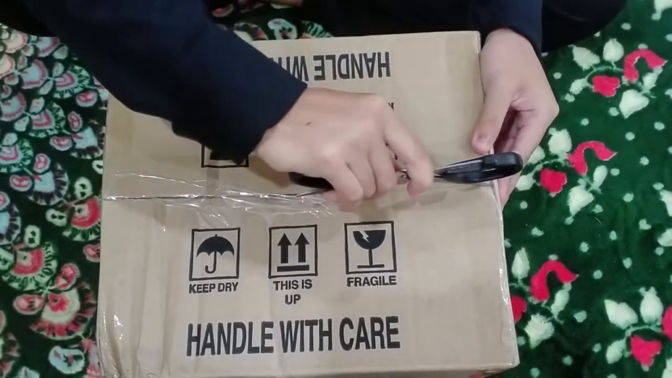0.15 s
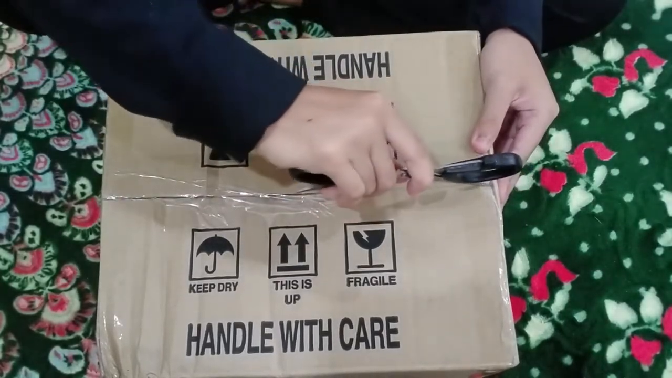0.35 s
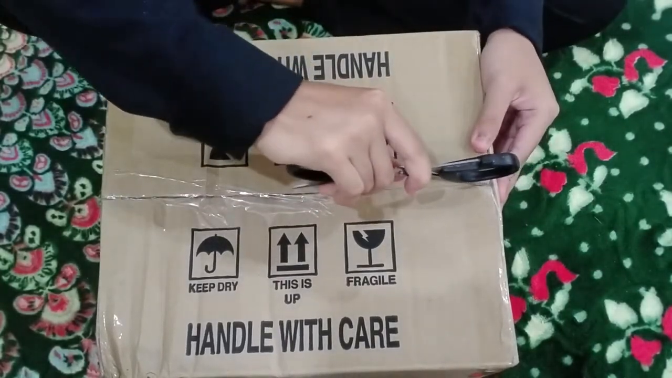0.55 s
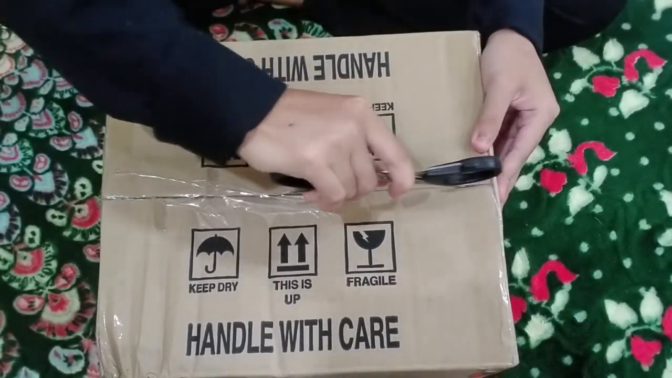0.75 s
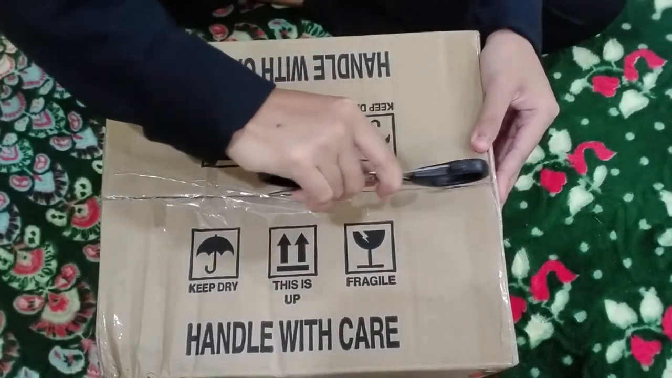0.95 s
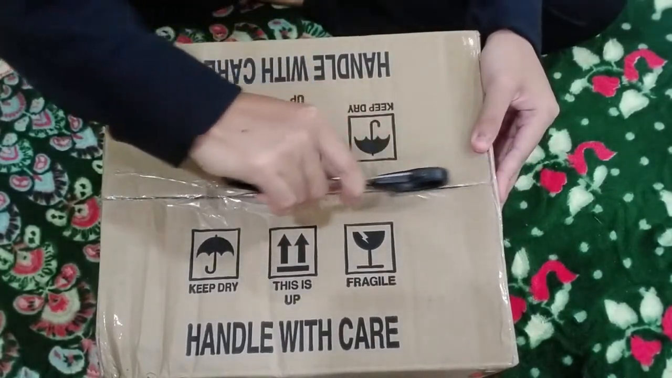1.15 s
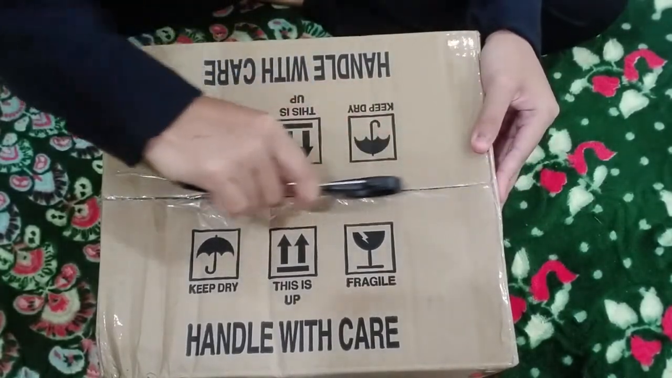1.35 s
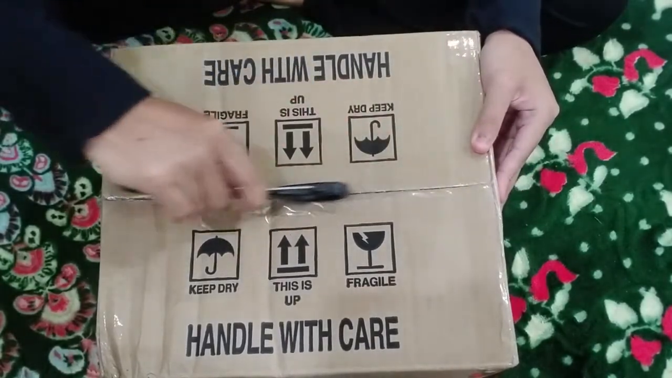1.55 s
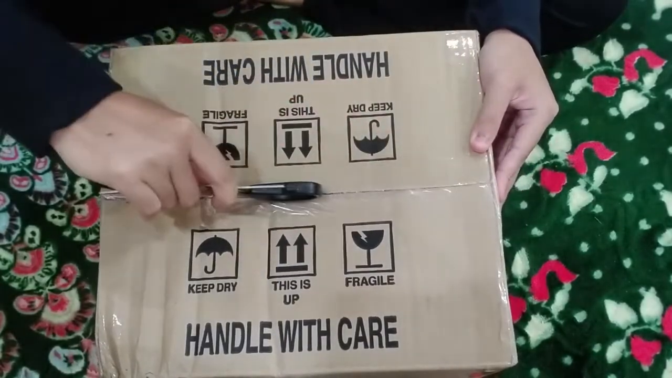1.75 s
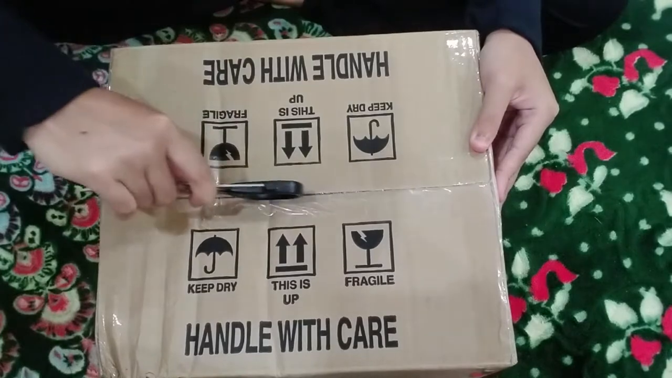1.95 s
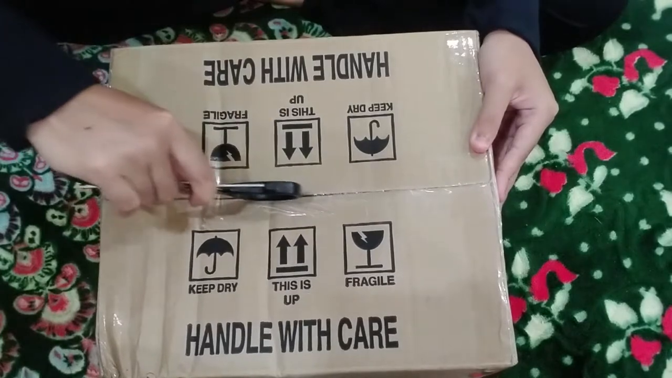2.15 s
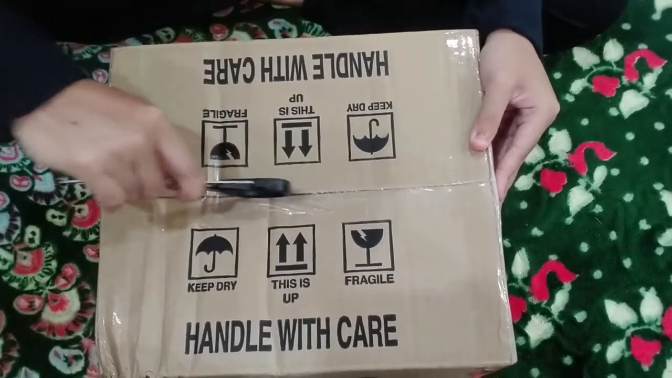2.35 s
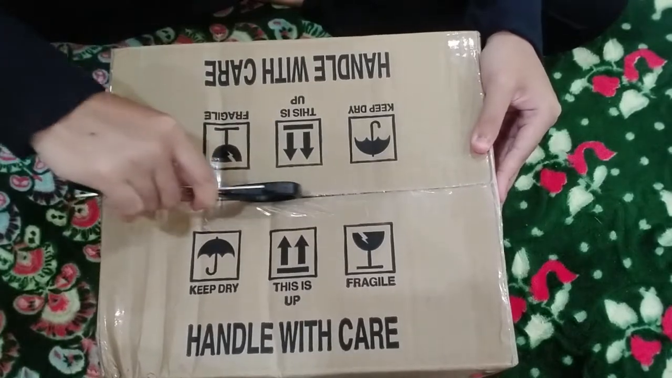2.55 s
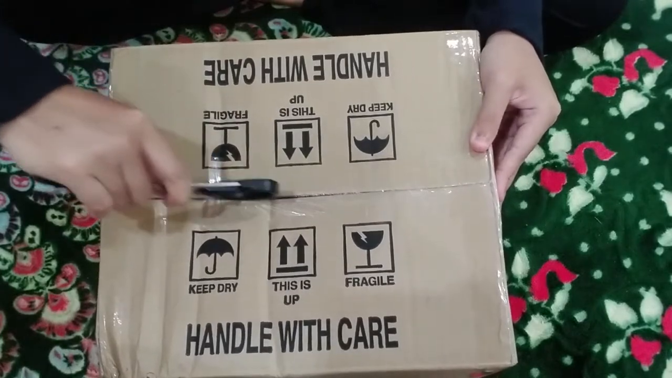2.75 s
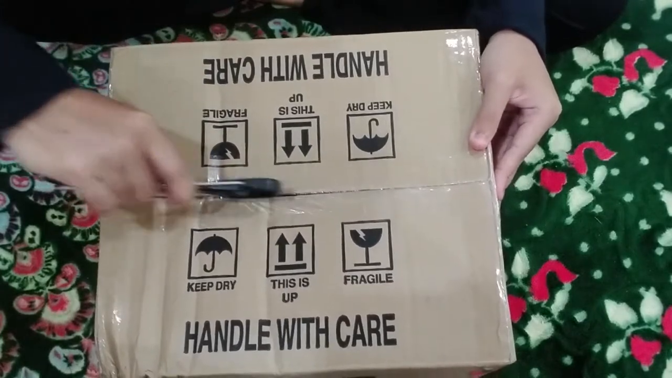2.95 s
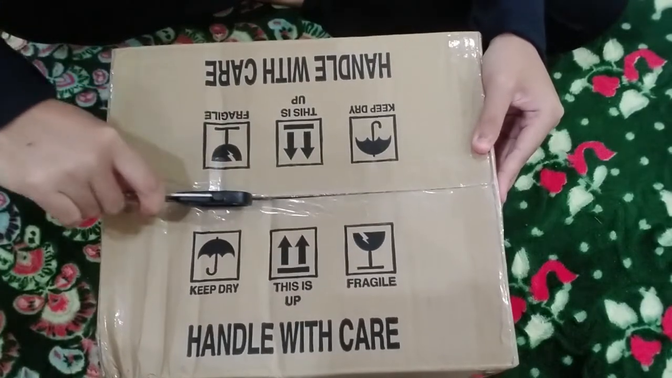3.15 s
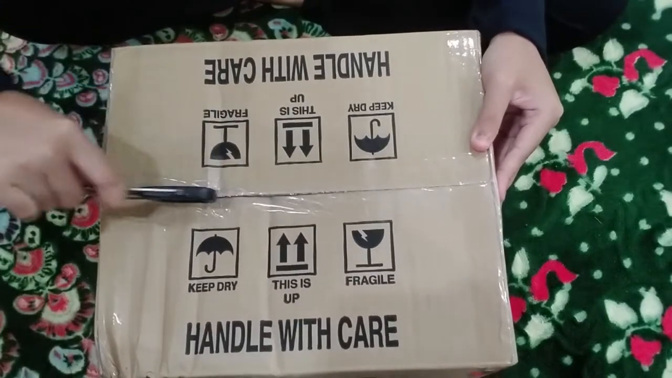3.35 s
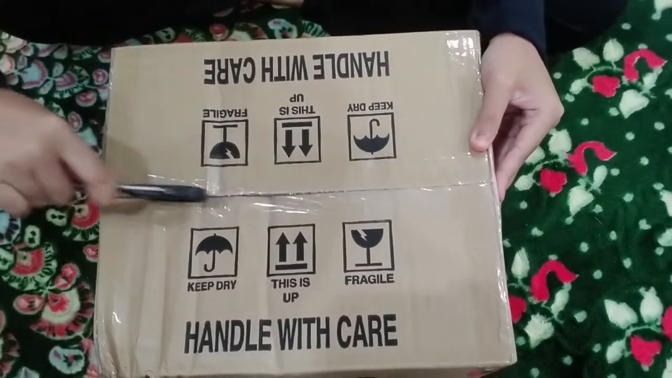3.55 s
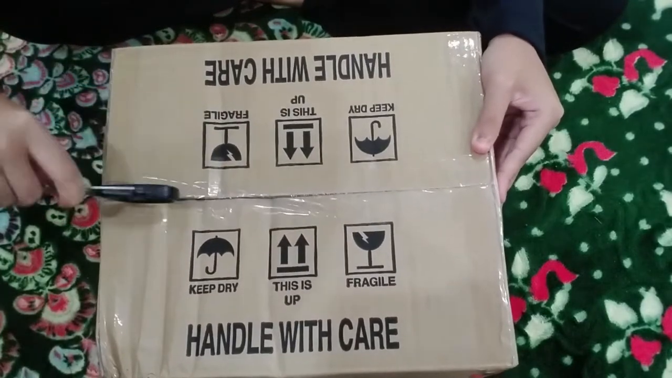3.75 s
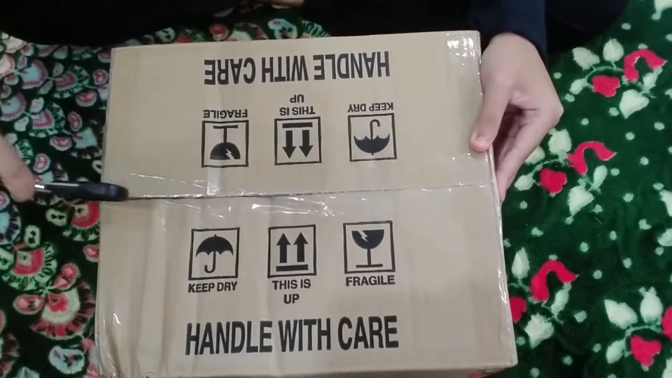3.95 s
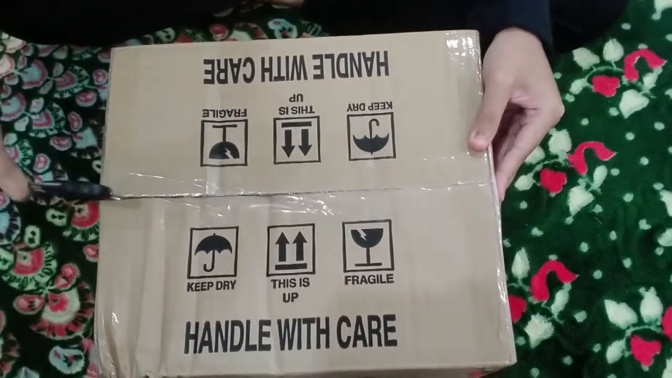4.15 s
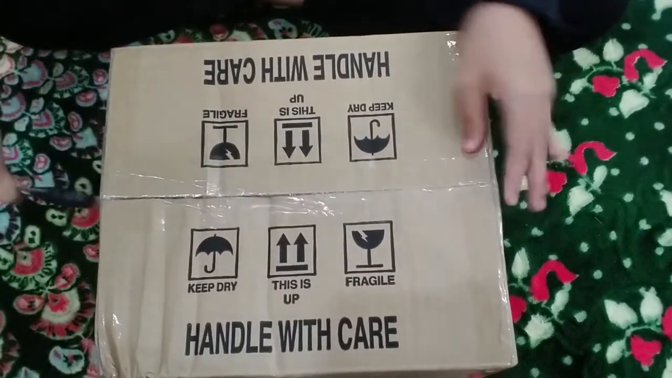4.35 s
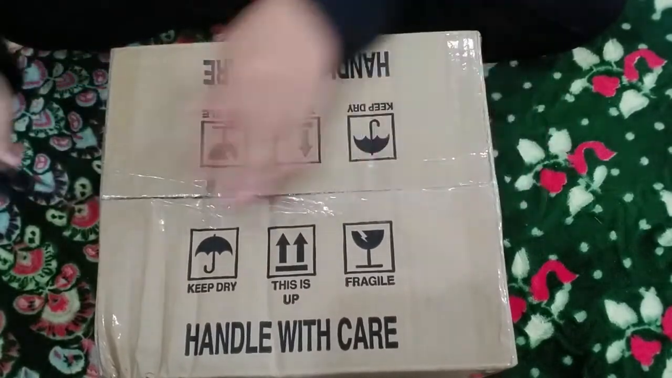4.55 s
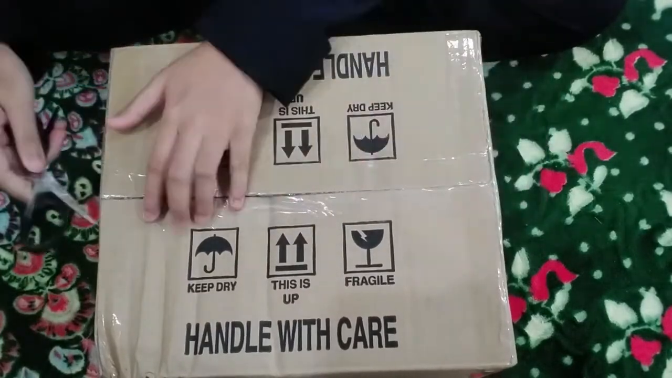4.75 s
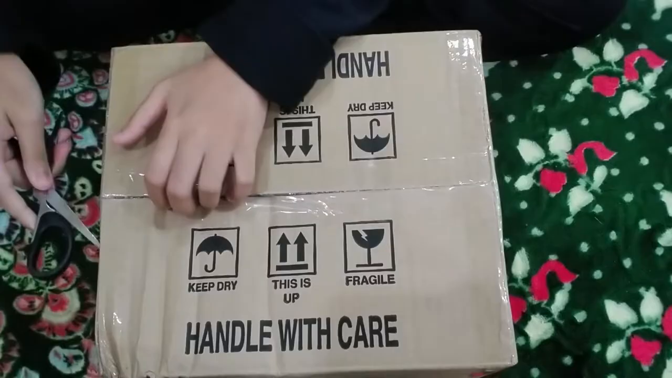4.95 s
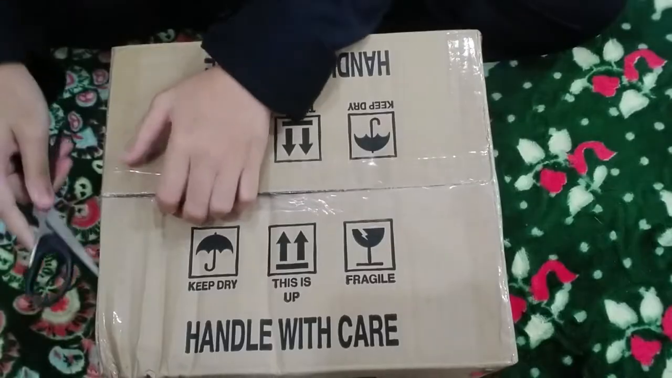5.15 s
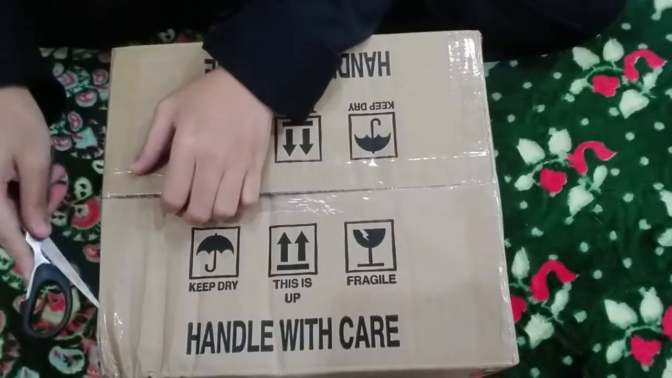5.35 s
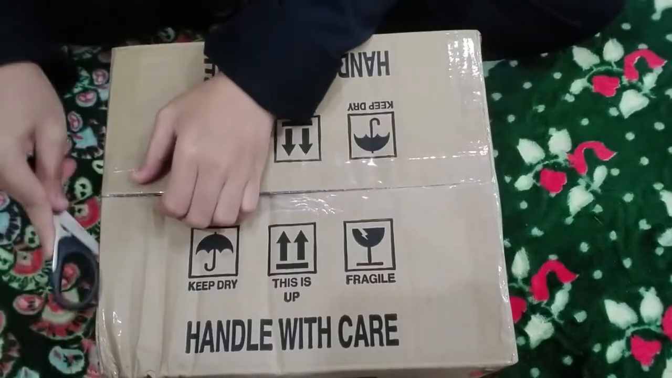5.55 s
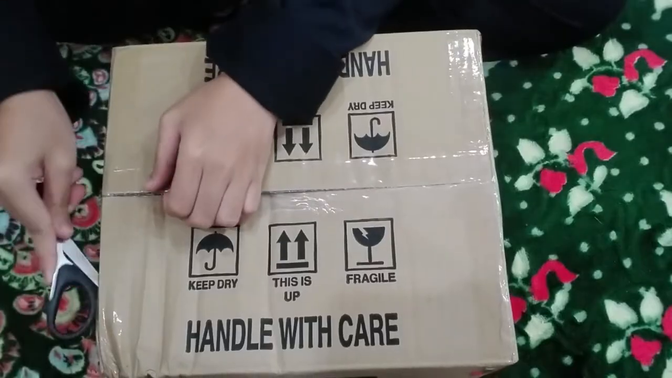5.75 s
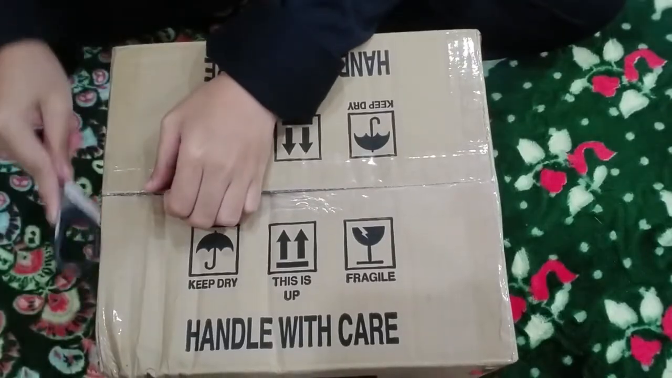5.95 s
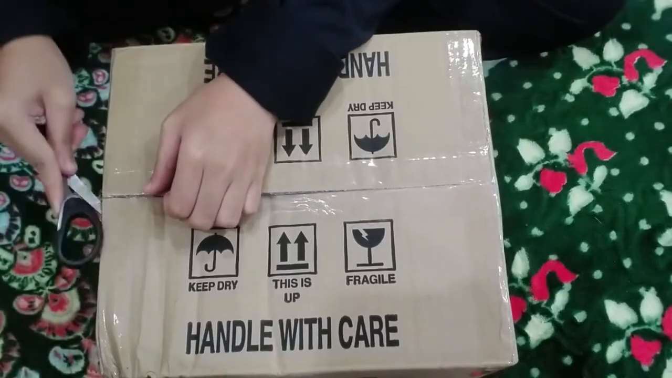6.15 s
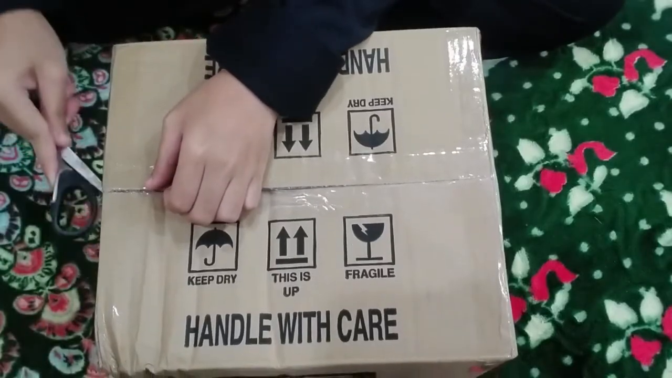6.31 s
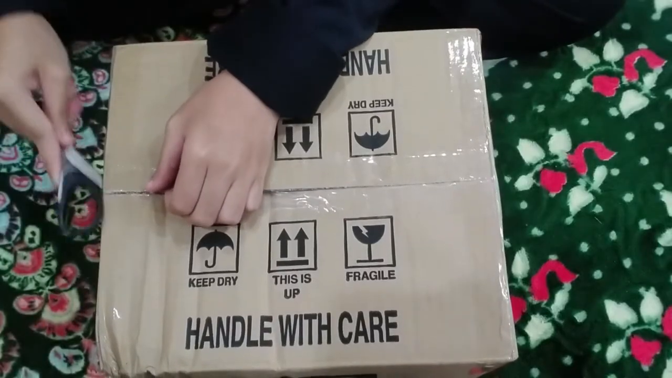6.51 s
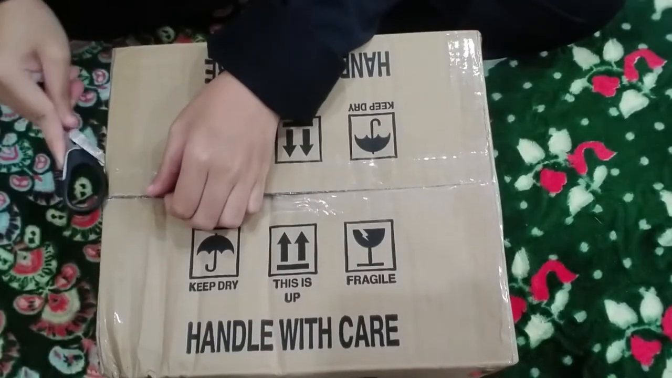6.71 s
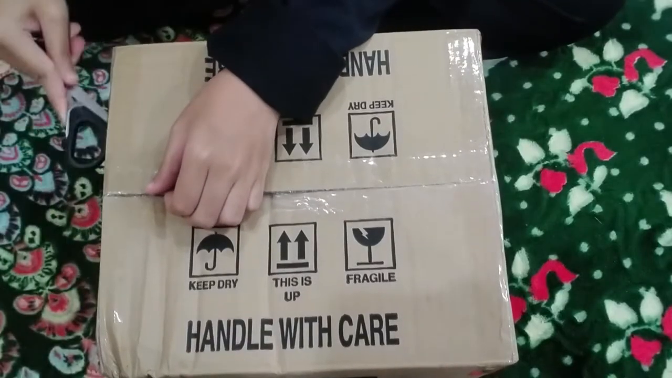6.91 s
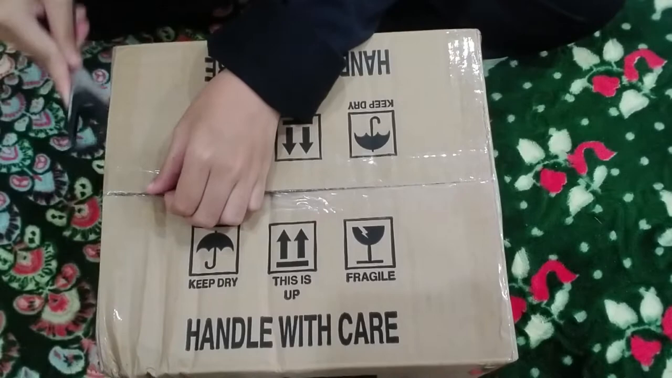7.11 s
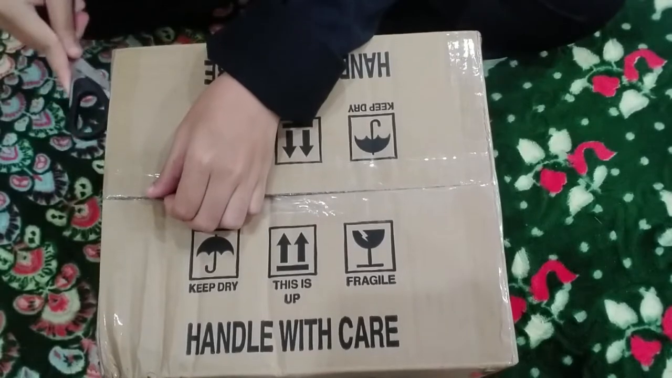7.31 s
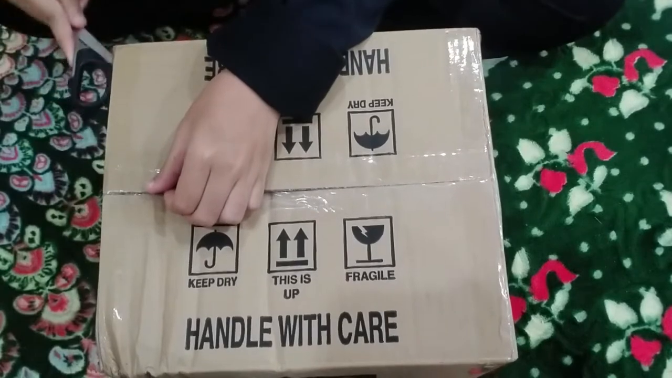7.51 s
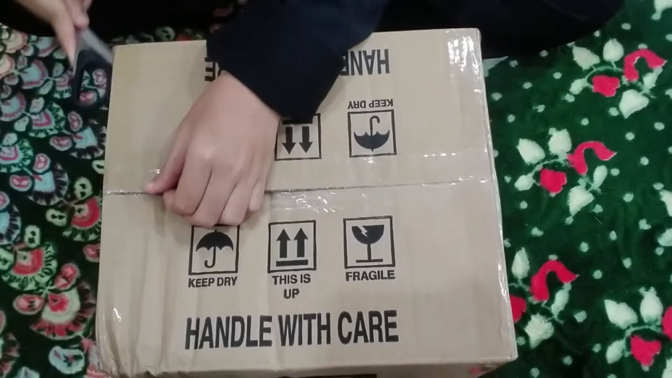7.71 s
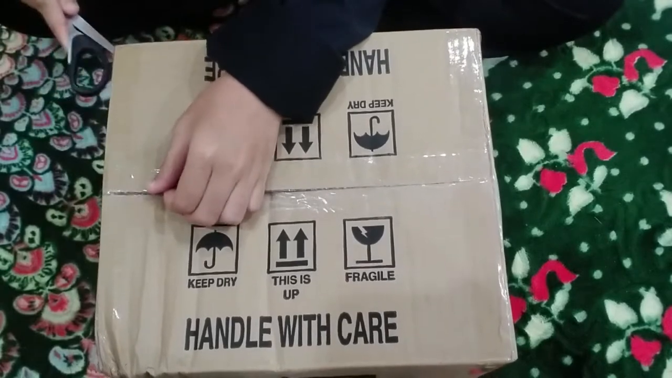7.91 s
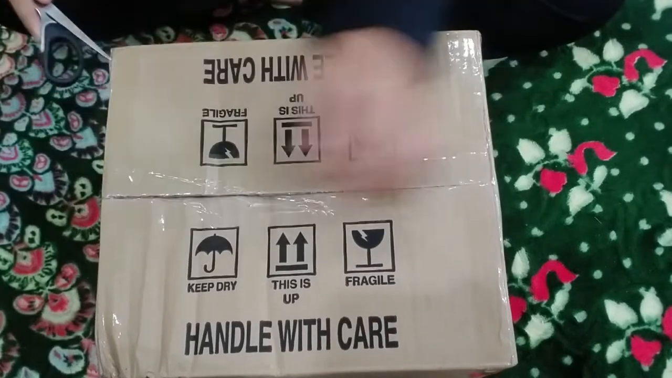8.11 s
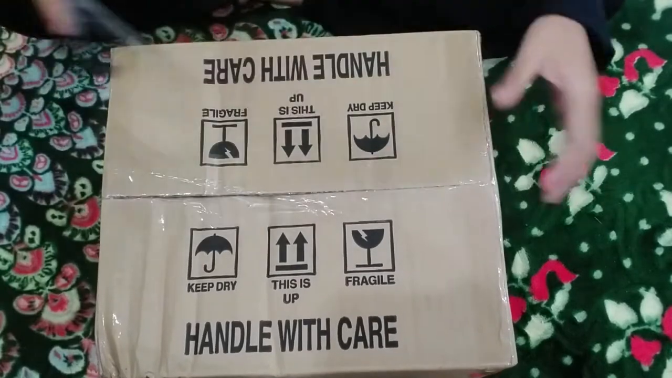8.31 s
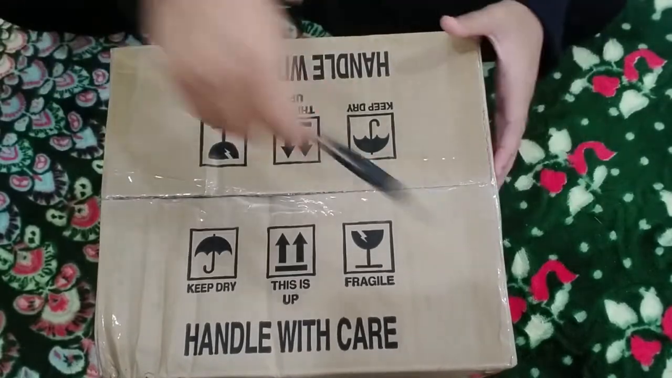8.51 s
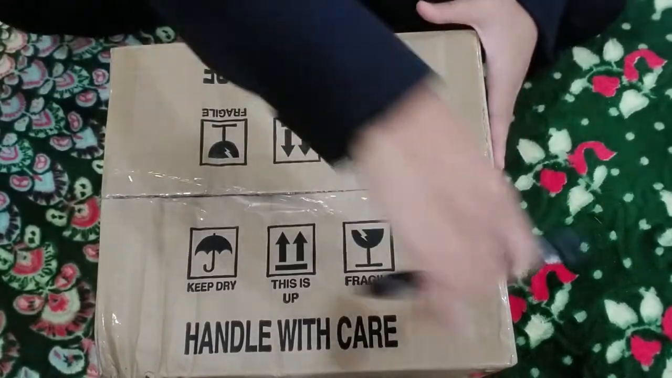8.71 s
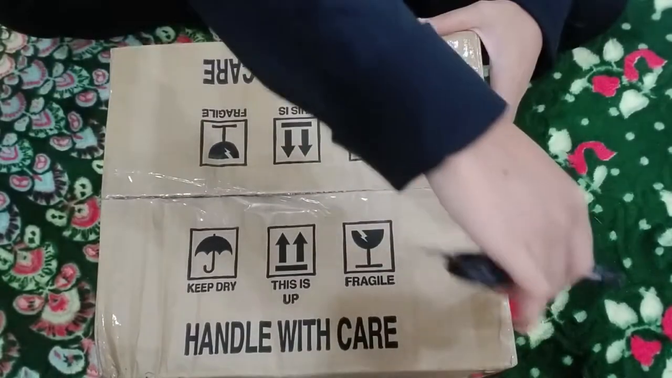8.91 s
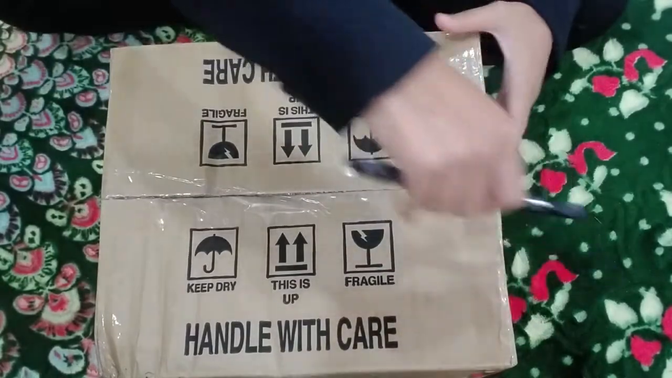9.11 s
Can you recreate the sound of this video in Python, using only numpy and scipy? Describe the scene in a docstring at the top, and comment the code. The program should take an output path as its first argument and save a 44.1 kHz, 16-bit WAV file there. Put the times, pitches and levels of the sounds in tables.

```python
"""Scissor blade on a taped cardboard box

A scissor blade is dragged down the taped seam of a hollow cardboard box, then saws at the folded tape.
Gritty friction noise excites modes of the box, resonances of the flaps and the hiss of the tape.
Crackles are decaying noise bursts, knocks are short pushes on the box modes, and the scissor steel
rings as decaying sines. Filtered noise gives a quiet room's hum and the microphone's faint hiss;
a phone's response shapes it all.
"""
import sys
import numpy as np
from scipy import signal
from scipy.fft import rfft, irfft
from scipy.io import wavfile
from scipy.ndimage import uniform_filter1d

SR = 44100
rng = np.random.default_rng(int(sys.argv[2]) if len(sys.argv) > 2 else 0)


def store_wav(level_fs):
    """Save 16-bit WAV to argv[1]."""
    pcm = np.round(np.clip(np.atleast_2d(level_fs), -1, 1) * 32767)
    wavfile.write(sys.argv[1], SR, pcm.T.astype(np.int16))


N = 408807
TIME = np.arange(N) / SR

# modes of the box panels and the enclosed air: freq_hz, level_db, free_t60_s
BOX = [(101.4, -8, 0.4), (134.5, -10.5, 0.23), (176.4, -8.5, 0.26), (208.3, 9, 0.097), (258, 3, 0.11),
       (287.5, 1.5, 0.25), (310.2, 2, 0.19), (340, -2, 0.19)]
# resonances of the flaps along the seam: freq_hz, width_hz, level_db
FLAPS = [(485.5, 49, 3.5), (599.5, 46, 1), (668, 51, 1.5), (811, 54, -2), (857, 71, -3), (1044, 124, -1),
         (1146, 85, -2), (1250, 91, -3.5), (1570, 434, -5), (1962, 286, -3.5), (2714, 530, -6),
         (2934, 354, -5.5), (3390, 100, -12.5)]
# spectrum of the tape: freq_hz, level_db
TAPE = [(3300, 1.5), (4200, -6), (5500, -7), (7000, -0.5), (9500, 10), (12000, -4.5)]
# spectrum of the thin hiss of the cut edge: freq_hz, level_db
EDGE = [(8000, -54), (11000, -2), (13500, 5.5), (16000, -2.5)]
# long slit down the seam: time_s, flap_rasp_db, then relative to the rasp:
# box_sides_db, lid_db, tape_hiss_db, edge_hiss_db
SLIT = [(1.1, -76, 12, 4, -5, -10), (1.118, -47.5, 19.5, 15.5, -5, -13), (1.196, -35, -12, 7, -8.5, -18),
        (1.32, -40.5, 1, 16, -9.5, -9), (1.442, -34.5, 8, 7.5, -10.5, -14),
        (1.51, -37.5, -5.5, 7.5, -8, -8), (1.598, -45, 7, 9, -3.5, -6), (1.66, -43, 8, 6, -6.5, -10),
        (1.74, -45, 9.5, 9.5, -2, -3), (1.814, -60.5, 9, 2, -5, 0), (1.87, -63, 6, 9, -12, -10)]
CRACK_T60_S = 0.016


def undb(db):
    """Logarithmic level: decibels become an amplitude gain."""
    return 10 ** (np.asarray(db) / 20)


def unit(x):
    """Mean power: scale a signal to an rms of 1."""
    return x / np.sqrt(np.mean(x ** 2))


def walk(rate, count=N):
    """Slow random modulation: random levels, each held 1 / rate seconds, smoothed into ramps."""
    k = int(SR / rate)
    steps = np.repeat(rng.standard_normal(count // k + 1), k)
    return uniform_filter1d(steps, k)[:count]


def colour(x, table, size=2048):
    """Minimum-phase filtering: the folded cepstrum of a log gain gives a causal response."""
    hz, db = np.transpose(table)
    f = np.maximum(np.arange(size // 2 + 1), .5) * SR / size
    gain = undb(np.interp(np.log(f), np.log(hz), db))
    cep = irfft(np.log(gain))
    cep[1:size // 2] *= 2
    cep[size // 2 + 1:] = 0
    response = irfft(np.exp(rfft(cep)))
    return signal.oaconvolve(x, response)[:len(x)]


def ring(modes, spread_db=0., length_s=.5):
    """Modal decay: a sum of damped sines, weighted anew at random for each point of contact."""
    t = np.arange(int(length_s * SR)) / SR
    chance = rng.standard_normal(len(modes))
    out = np.zeros(len(t))
    for (hz, db, t60), c in zip(modes, chance):
        decay = np.exp(-np.log(1000) * t / t60)
        out += undb(db + spread_db * c) * np.sin(2 * np.pi * hz * t) * decay
    return out


def add(out, s, sound, peak_db):
    """Superposition: lay a sound into out at s seconds with the given peak."""
    i = int(s * SR)
    n = min(len(sound), len(out) - i)
    out[i:i + n] += undb(peak_db) * sound[:n] / np.max(np.abs(sound))


def blade():
    """Friction excitation: one rough force drives box, flaps and tape, each at its own level."""
    # spectrum of the creases in the tape: freq_hz, level_db
    crease = [(3200, -13.5), (4300, -10), (6200, -2), (7500, -17.5)]
    grain_hz = 1400  # above it the fibres tear, below it the flaps flex
    deep_hz = 230  # below it the large sides of the box, above it the lid
    uneven_db, uneven_per_s = 1.87, 35  # the hand's pressure stumbles over the board's ribs
    saw_from_s = 5.5  # from here the blade saws at the folded tape on the end of the box
    crease_db, fold_db = -15, -9.5  # crinkle relative to the tape hiss, along the seam and at the fold
    ticks_per_s, ticks_db, ticks_spread_db = 25, 5, 3.5  # small crackles, size relative to the hiss

    rasp, fibres, sides, lid, hiss, edge = pressure()
    force = grit(per_s=600, spread_db=2.5, smear_ms=1.5, share=.7)
    force = force * undb(uneven_db * walk(uneven_per_s))

    flexing = [m for m in FLAPS if m[0] < grain_hz]
    tearing = [m for m in FLAPS if m[0] > grain_hz]
    out = rasp * unit(flaps(force, flexing, wander_db=2.0))
    out += fibres * unit(flaps(force, tearing, wander_db=3.0))
    out += hiss * unit(colour(force, TAPE)) + edge * unit(colour(force, EDGE))

    # creases in the tape crinkle in patches
    crinkle_db = np.where(TIME < saw_from_s, crease_db, fold_db) + 3.9 * walk(8)
    out += hiss * undb(crinkle_db) * unit(colour(force, crease))

    # small patches of glue let go at random under the blade
    tick_sizes = undb(ticks_db + ticks_spread_db * rng.standard_normal(N))
    ticks = (rng.random(N) < ticks_per_s / SR) * tick_sizes
    tail = np.exp(-np.log(1000) * TIME[:2048] / CRACK_T60_S)
    envelope = signal.oaconvolve(ticks, tail)[:N]
    out += hiss * envelope * unit(colour(rng.standard_normal(N), TAPE))

    # the box rings on after the force changes
    deep = [m for m in BOX if m[0] < deep_hz]
    high = [m for m in BOX if m[0] > deep_hz]
    for gain, modes in ((sides, deep), (lid, high)):
        body = ring(modes)
        body = body / np.sqrt(np.sum(body ** 2))
        out += signal.oaconvolve(force * gain, body)[:N]
    return out


def pressure():
    """Contact force: the slit and the swelling strokes add in power; gains come out per layer."""
    # short strokes and rubs: full_pressure_s, rise_s, hold_s, fall_s, flap_rasp_db,
    # then relative to the rasp: box_sides_db, lid_db, tape_hiss_db, edge_hiss_db
    strokes = [(0.147, 0.0091, 0.0045, 0.1, -54.5, -2, 3, -11, -17),
               (0.821, 0.02, .06, 0.14, -49.5, 7.5, 10, -7, -8),
               (1.074, 0.073, .005, 0.032, -57.5, 13, 9.5, 0.5, -5),
               (1.938, 0.11, 0.034, 0.27, -57.5, 0, 1.5, -1.5, -6),
               (2.054, 0.17, 0.018, .15, -55, 4, 3, -10, -19),
               (2.166, 0.093, 0.037, .1, -64, 12, 6, 0.5, 11),
               (2.255, 0.025, 0.014, 0.018, -57.5, 8, 11.5, 2.5, 8),
               (2.294, .04, 0.019, 0.18, -55, 8.5, 7, -15, -18),
               (2.501, 0.085, 0.012, 0.033, -48.5, 16.5, 2.5, -1.5, -8),
               (2.579, .03, .02, 0.055, -60.5, 7, 14, 1, 9),
               (2.641, 0.056, .005, 0.058, -40.5, 0, 8, -14, -18),
               (2.728, 0.0076, 0.074, 0.11, -51, 13, 0, 2, 1),
               (2.94, 0.041, .005, 0.11, -41, 3, 10, -10.5, -16),
               (3.072, 0.072, 0.028, .05, -46.5, 13, 6, 0, 1),
               (3.118, 0.0035, .003, 0.075, -26.5, 7.5, 10.5, -8, -17),
               (3.187, .01, 0.0025, 0.017, -33.5, -7, -4, -25, -7),
               (3.199, .02, 0.0043, 0.16, -42.5, 10, 14.5, -14.5, -25),
               (3.452, 0.093, 0.0058, 0.093, -36.5, -2.5, -4, -7, -12),
               (3.699, 0.038, 0.057, 0.034, -34.5, -1.5, -1, -6.5, -19),
               (3.82, .03, .02, 0.14, -55.5, -4, 8.5, -9, -18),
               (3.977, .035, 0.053, 0.052, -38.5, -4, 1.5, -8, -14),
               (4.1, .03, .02, 0.16, -60, 1, 8.5, -5.5, -8),
               (4.322, .025, .003, .03, -53, 8.5, -5, -35, -35),
               (4.467, 0.013, 0.0027, 0.02, -35, -16, 4, -15, -10),
               (4.48, 0.022, 0.024, 0.18, -51.5, 3.5, 9.5, -9, -23),
               (4.796, .006, .01, 0.056, -63, 24.5, 0, 3, 8),
               (4.878, .035, 0.024, 0.082, -54.5, 14, 16.5, -5, -13),
               (4.968, 0.044, 0.011, 0.2, -53, 13.5, 0, -4, -5),
               (5.179, .03, .005, 0.18, -59, -4, 7, -8, -14),
               (5.385, 0.22, 0.017, 0.19, -61, -3, -4, -6, -6),
               (5.544, 0.0062, 0.034, 0.03, -41, -1, 8.5, 1.5, 1.5),
               (5.58, 0.024, .005, 0.085, -36, 3, 11, -12, -19),
               (5.726, 0.08, 0.051, 0.16, -46.5, -4, 3.5, -6, -11),
               (6.033, 0.14, 0.083, 0.062, -38.5, 5, 0, -2.5, -4.5),
               (6.251, 0.1, .005, 0.05, -48, 1, 3, -12, -24),
               (6.382, 0.044, 0.0054, 0.074, -44, 7, 1.5, -2, -9),
               (6.553, 0.096, .005, 0.053, -47.5, -5, 3.5, -10.5, -27),
               (6.724, 0.11, 0.0094, 0.074, -40, 2.5, 5, -5, -11),
               (6.81, .03, 0.025, 0.2, -59.5, 10, 7, -5, -17),
               (6.969, 0.051, 0.034, 0.085, -46, 0.5, 3.5, 4, -1),
               (7.128, .045, .005, 0.038, -43.5, -7, -4.5, -11, -17),
               (7.242, 0.055, 0.076, 0.057, -45.5, -7, 4.5, -1.5, -4.5),
               (7.424, .035, .005, 0.062, -54, 0, 1, -8, -19),
               (7.55, .01, 0.036, 0.072, -54.5, -6, 7, 7, 1),
               (7.604, 0.12, 0.0069, 0.085, -49, -17, 4, -8, -9),
               (7.749, 0.039, .005, 0.048, -45, -5, 3.5, -11, -20),
               (7.908, 0.07, 0.012, 0.053, -47, -5, 1, -1, -5),
               (8.163, 0.14, .01, 0.097, -52, 1, 2.5, -3, -4.5),
               (8.237, 0.01, .003, 0.037, -48, -16, -3, 0.5, -4),
               (8.315, .012, 0.0044, 0.059, -47.5, -10, -1.5, -1.5, -2),
               (8.38, .03, 0.03, 0.11, -65.5, -7, 6, 2, -3), (8.6, 0.07, .005, .07, -68, -10, 4, -4, -11),
               (8.682, .006, 0.022, .1, -75, -9, 14, 2, 14), (8.733, .1, .02, 0.18, -67, 4, 13.5, -5, 0),
               (8.924, .015, .02, 0.11, -66.5, 10, -7, -1, 0),
               (9.148, .2, 0.023, 0.26, -67.5, 6, 10, -25, -24)]
    swell_db = 20  # a stroke gains this much in its rise time and loses it in its fall time
    swell_power = 1.24  # above 1: round top, steep ends
    fibres_db, fibres_per_hiss = -3, 0.36  # relative to the rasp; they follow the tape hiss in part

    def layers(rasp, sides, lid, hiss, edge):
        """Relative levels: rasp, fibres, sides, lid, hiss and edge in dB."""
        fibres = fibres_db + fibres_per_hiss * hiss
        return rasp + np.array([0 * rasp, fibres, sides, lid, hiss, edge])

    t = TIME[::32]
    s, *columns = np.transpose(SLIT)
    slit_db = layers(*(np.interp(t, s, c) for c in columns))
    power = undb(2 * slit_db) * (t > s[0]) * (t < s[-1])
    for s, rise, hold, fall, *levels in strokes:
        before = np.maximum((s - t) / max(rise, .002), 0)
        after = np.maximum((t - s - hold) / max(fall, .002), 0)
        lost_db = swell_db * (before + after) ** swell_power
        power += undb(2 * (layers(*levels)[:, None] - lost_db))
    return [np.interp(TIME, t, np.sqrt(p)) for p in power]


def grit(per_s, spread_db, smear_ms, share):
    """Stick-slip friction: random slips of unequal size, with short noise tails, over smooth rubbing."""
    size = (rng.random(N) < per_s / SR) * undb(spread_db * rng.standard_normal(N))
    tail = np.exp(-np.arange(int(.02 * SR)) / (SR * smear_ms / 1000))
    slips = signal.oaconvolve(size, tail)[:N] * rng.standard_normal(N)
    return unit(share * unit(slips) + rng.standard_normal(N))


def flaps(force, modes, wander_db=0.):
    """Resonant filtering: flap modes in alternating sign, whose weights wander as the blade moves."""
    top_hz = 3420
    out = np.zeros(len(force))
    for k, (hz, width, db) in enumerate(modes):
        weight = (-1) ** k * undb(db + wander_db * walk(7)[:len(force)])
        out += weight * signal.lfilter(*signal.iirpeak(hz, hz / width, SR), force)
    return signal.sosfilt(signal.butter(4, top_hz, fs=SR, output="sos"), out)


def knocks():
    """Impact excitation: a short push rings modes near the struck pitch; a noise burst slaps the flaps."""
    # blows on the box: start_s, peak_db, flap_slap_relative_db, panel_pitch_hz, slap_pitch_hz
    blows = [(0.16, -36, -13, 225, 840), (0.878, -27.5, -12, 280, 700), (0.913, -24, -11, 180, 600),
             (1.117, -27, -6, 192, 520), (1.15, -18, -7, 197, 595), (1.255, -16, -15, 293, 557),
             (1.319, -13.5, -11.5, 307, 630), (1.354, -14, -12, 306, 681), (1.39, -12.5, -13, 301, 818),
             (1.422, -19.5, -10, 299, 896), (1.44, -16, -22, 302, 600), (1.465, -14.5, -9.5, 310, 1140),
             (2.285, -28, -21, 218, 506), (2.496, -18, -38, 221, 541), (2.64, -21, -15, 344, 546),
             (2.931, -35, 3, 258, 1330), (2.954, -14.5, -28, 214, 544), (3.12, -4.5, -12, 340, 990),
             (3.154, -8, -25, 310, 680), (3.191, -12.5, -2.5, 323, 596), (3.258, -20.5, -22, 315, 584),
             (3.951, -35.5, -3, 285, 673), (4.463, -20, -3, 228, 1040), (4.5, -27.5, -7, 256, 1130),
             (4.811, -24.5, -29, 158, 511), (4.868, -29, -26, 231, 501), (4.917, -21.5, -25, 135, 571),
             (4.949, -27, -23, 253, 528), (4.975, -33, -5, 200, 1970), (4.991, -24.5, -15, 180, 1500),
             (5.577, -14.5, -9.5, 246, 495), (6.078, -26, -25, 190, 550), (6.693, -29, -24, 194, 681),
             (6.721, -27, -1, 183, 554), (8.233, -40, 9, 312, 1160), (8.313, -39, -10, 288, 598)]
    push_cycles = 0.43  # length of the push in cycles of the struck panel
    judder_cycles = 4.4  # in the seam the blade judders at the lid's pitch for this many cycles
    # share of the free ring time left under hand or blade, and while the blade slides down the seam
    held_share, slit_share = 0.41, 0.62
    near_db_per_oct, slit_db_per_oct = 22, 50  # how fast modes away from the struck pitch drop out

    out = np.zeros(N)
    t = np.arange(int(.08 * SR)) / SR
    for s, db, slap_db, hz, slap_hz in blows:
        sliding = SLIT[2][0] < s < SLIT[-1][0]
        if sliding:
            cycles, share, drop_db = judder_cycles, slit_share, slit_db_per_oct
        else:
            cycles, share, drop_db = push_cycles, held_share, near_db_per_oct
        push = np.sin(np.pi * np.clip(t * hz / cycles, 0, 1))
        if sliding:
            push = push * np.cos(2 * np.pi * hz * t)
        struck = [(f, g - drop_db * abs(np.log2(f / hz)), t60 * share) for f, g, t60 in BOX]
        add(out, s, signal.oaconvolve(ring(struck, spread_db=1.5), push), db)

        slapped = [(f, width, g - 8 * abs(np.log2(f / slap_hz))) for f, width, g in FLAPS]
        burst = rng.standard_normal(len(t)) * np.exp(-t / 0.0027)
        add(out, s, flaps(burst, slapped), db + slap_db)
    return out


def cracks():
    """Sudden release: glue lets go as a decaying burst in tape and edge, with a duller part of the board."""
    # tape crackles: start_s, tape_peak_db, board_relative_db, edge_relative_db
    releases = [(0.145, -38, -16, -14), (0.818, -33, -23, -16), (0.917, -33, -30, -17),
                (1.059, -45, -2, -14), (1.0872, -34.5, -22, -14), (1.1236, -31, -22, -18),
                (1.36, -37, -6, -6), (1.586, -34, -2, -9), (1.637, -33, -1, 2), (1.748, -29, -30, -21),
                (1.818, -41.5, -21, 5), (1.908, -38, -20, -2), (1.9262, -31.5, -14, 1),
                (2.0958, -44.5, 5, -14), (2.165, -32, -20, 4), (2.2577, -39.5, -17, -2),
                (2.566, -42, -16, -1), (2.589, -38.5, 5, -9), (2.7265, -38, -13, -12),
                (2.8873, -38.5, -15, 7), (3.0016, -41.5, 6, -12), (3.117, -24.5, -1, -21),
                (3.1932, -29, -14, -7), (3.268, -41, -10, -23), (3.471, -23, -32, -21),
                (3.583, -34, -28, -18), (3.6, -42, -20, -18), (3.676, -42, -14, -14),
                (3.9619, -39, -11, -5), (4.081, -31.5, -31, -17), (4.109, -41, -22, -13),
                (4.142, -44, -20, -12), (4.465, -37.5, 17.5, -10), (4.7926, -41, -4, -8),
                (4.8707, -31.5, -25, -1), (4.908, -35, -24, 10.5), (4.954, -37, -13, -13),
                (4.9777, -35, -9, -13), (4.9949, -26.5, -11, 3), (5.145, -39, -6, -1),
                (5.5496, -29, 8, -13), (6.056, -30, -12, -14), (6.142, -38, -15, -10),
                (6.3578, -37, -5, -14), (6.3795, -29, -10, -14), (6.6941, -27.5, -6, -15),
                (6.7975, -46, -15, -8), (6.9316, -45, -4, -9), (6.9533, -28, -10, -11),
                (7.052, -44, -8, -14), (7.0996, -38, -12, -17), (7.5274, -29, -36, -25),
                (7.7416, -37.5, -18, -11), (8.2414, -28, -10, -17), (8.296, -43, -12, -15),
                (8.3142, -20.5, -6, -18), (8.675, -34, -44, 7), (8.9221, -32.5, -35, 2),
                (9.2504, -52, -17, 8)]
    # spectrum of the dull board part: freq_hz, level_db
    board = [(600, -1), (1200, 8), (3500, 4.5), (5000, -9.5)]
    out = np.zeros(N)
    t = np.arange(int(.06 * SR)) / SR
    for s, db, low_db, high_db in releases:
        burst = rng.standard_normal(len(t)) * np.exp(-np.log(1000) * t / CRACK_T60_S)
        for table, part_db in ((TAPE, db), (board, db + low_db), (EDGE, db + high_db)):
            add(out, s, colour(burst, table, size=256), part_db)
    return out


def clinks():
    """Modes under rattle: the loose steel halves rattle for a moment and ring faintly high up."""
    # clinks of the scissor halves: start_s, peak_db
    contacts = [(8.314, -57), (8.675, -31), (8.689, -44)]
    # modes of the steel: freq_hz, level_db, t60_s
    steel = [(5230, -4.5, 0.011), (8200, -11, .04), (9200, 4, 0.046), (10100, -5, 0.033), (10800, -8, .03),
             (13000, -20, .03), (14310, -5, .05), (15270, -14, .04)]
    rattle_s, tail_db, tail_s = 0.0022, -21, .05  # time constants, and the tail's relative level
    out = np.zeros(N)
    t = np.arange(int(.15 * SR)) / SR
    for s, db in contacts:
        envelope = np.exp(-t / rattle_s) + undb(tail_db) * np.exp(-t / tail_s)
        rattle = rng.standard_normal(len(t)) * envelope
        add(out, s, signal.oaconvolve(ring(steel, length_s=.2), rattle), db)
    return out


def background():
    """Filtered noise: the quiet room and the microphone's faint hiss, each swelling a little at random."""
    # spectrum of the room's hum: freq_hz, relative_density_db
    room = [(18, -91), (30, -79), (85, 0), (125, -13.5), (194, -5.5), (463, -11.5), (510, -18), (642, -21),
            (874, -20.5), (3000, -33.5), (3900, -65), (6600, -120)]
    # bands of the microphone's hiss: freq_hz, relative_density_db
    mic_hiss = [(1760, -25), (3000, -13), (3360, 3), (3570, -3), (3810, -11.5), (4110, -20), (5250, -7),
                (5600, -10), (5710, -17), (6390, -23), (6900, -6), (7460, -17.5), (10200, -7.5),
                (15100, -16), (16000, -9)]
    room_db, mic_hiss_db = -53.5, -70  # rms levels about which they swell
    hum = unit(colour(rng.standard_normal(N), room, size=4096)) * undb(room_db + 2.2 * walk(5.2))
    hiss = unit(colour(rng.standard_normal(N), mic_hiss)) * undb(mic_hiss_db + 3.8 * walk(9))
    return hum + hiss


def scene():
    """Radiation and reverberation: sources, their room tail, the room's hum and the microphone's hiss."""
    box_low_hz, room_t60_s, room_db = 116, 0.16, -15.5
    near = blade() + knocks() + cracks() + clinks()
    # a small box sends out little deep bass
    near = signal.sosfilt(signal.butter(2, box_low_hz, "high", fs=SR, output="sos"), near)
    t = np.arange(int(.5 * SR)) / SR
    tail = rng.standard_normal(len(t)) * np.exp(-np.log(1000) * t / room_t60_s)
    tail = tail * (t > .004)  # the reflections begin after 4 ms
    wet = signal.oaconvolve(near, tail / np.sqrt(np.sum(tail ** 2)))[:N]
    return (near + undb(room_db) * wet + background())[None]


def record(dry):
    """Receiver response: the phone drops the bass, colours the treble and cuts the top."""
    # response of the phone's port and mesh: freq_hz, level_db
    phone = [(30, -5), (60, -16.5), (100, -6.5), (160, -0.5), (3300, -1.5), (4100, -0.5), (5600, 0),
             (7500, 4.5), (7900, 0), (8300, 3.5), (9500, -10.5), (11500, -9.5), (14000, -2.5), (15600, 4)]
    top_hz = 15680
    coloured = colour(dry[0], phone, size=4096)
    return signal.sosfilt(signal.ellip(10, .3, 70, top_hz, fs=SR, output="sos"), coloured)[None]


dry = scene()
out = record(dry)
store_wav(out)
```